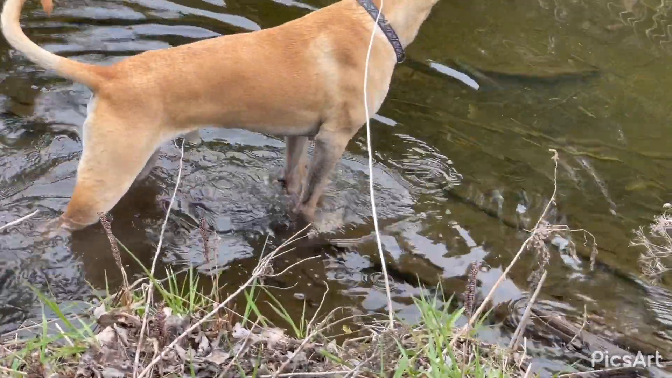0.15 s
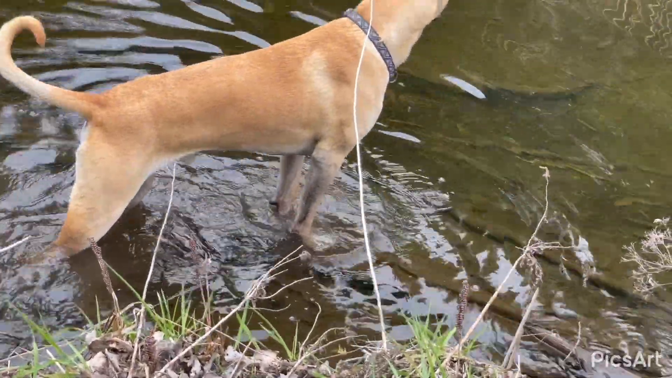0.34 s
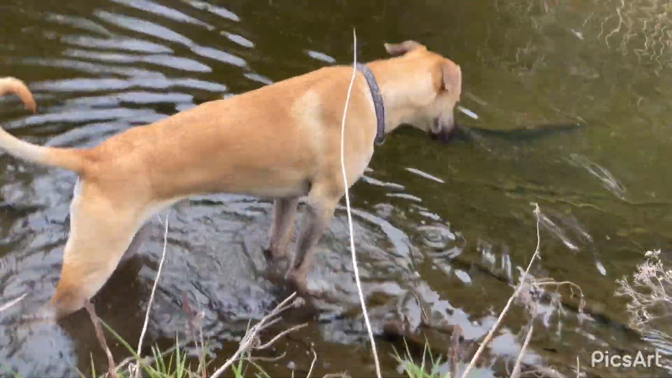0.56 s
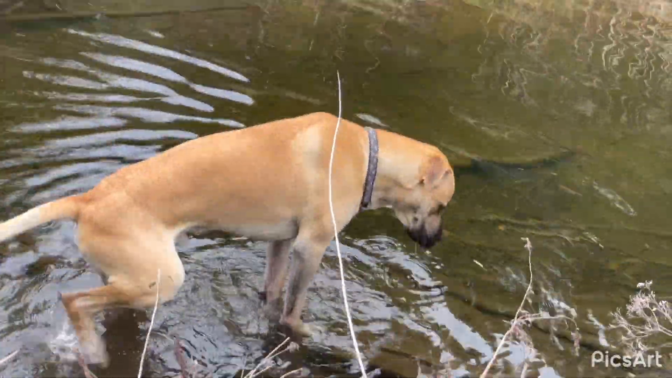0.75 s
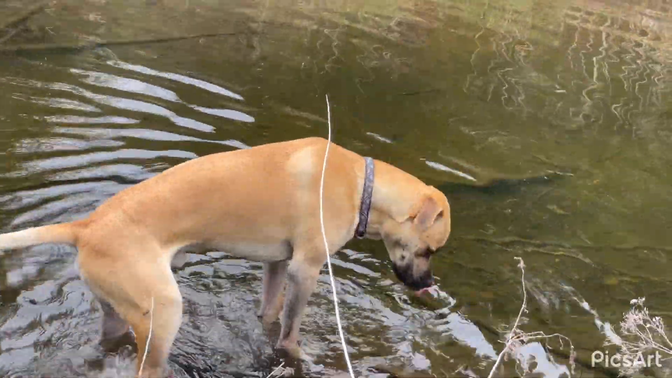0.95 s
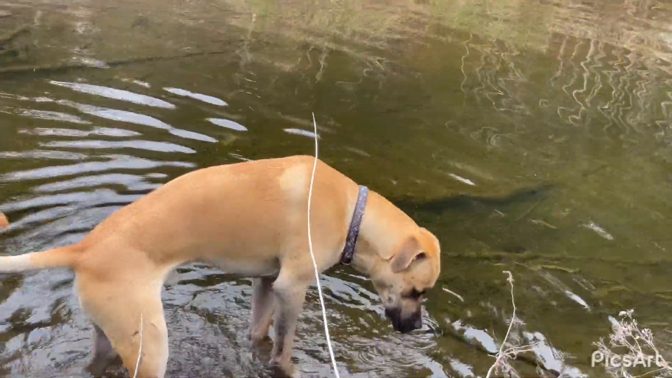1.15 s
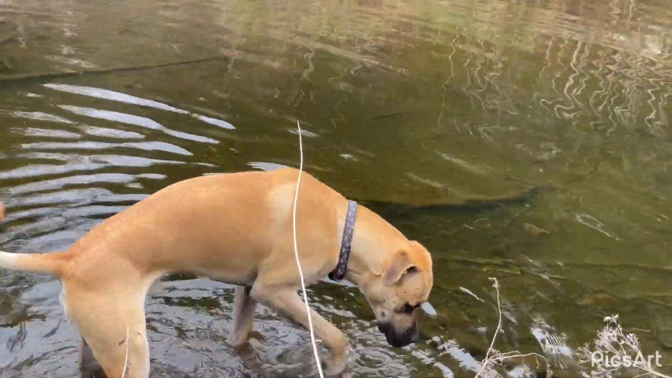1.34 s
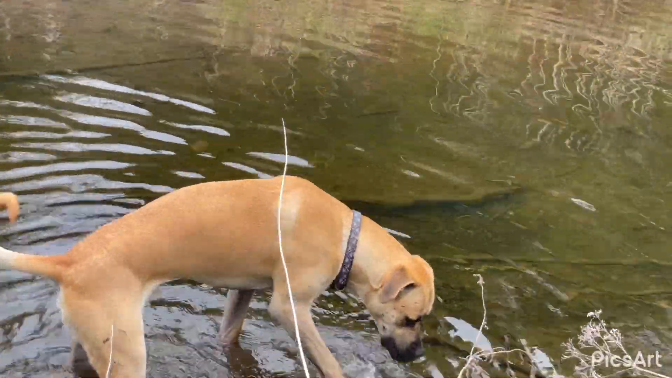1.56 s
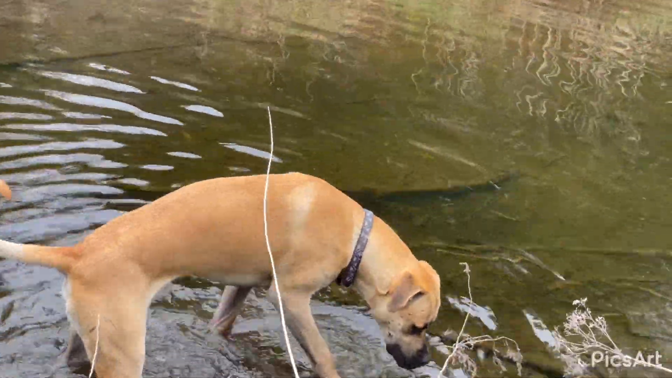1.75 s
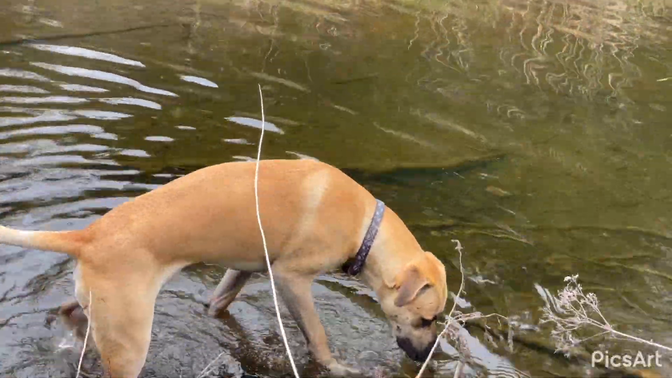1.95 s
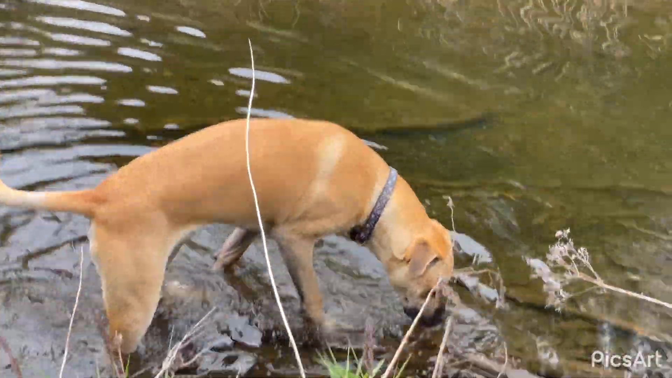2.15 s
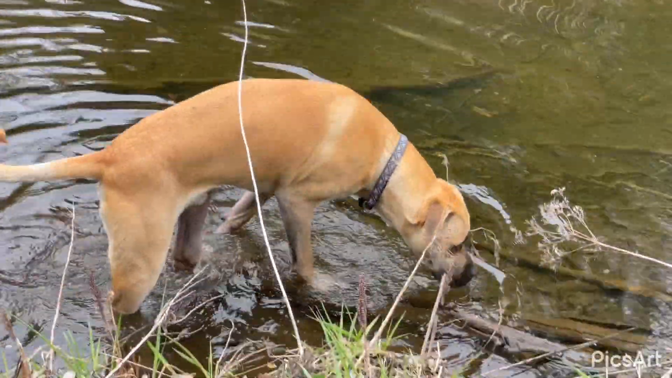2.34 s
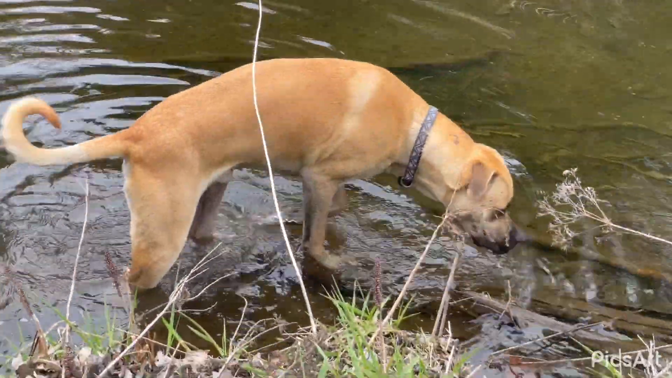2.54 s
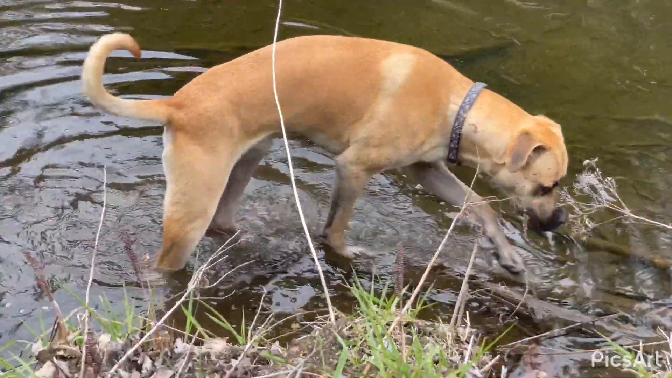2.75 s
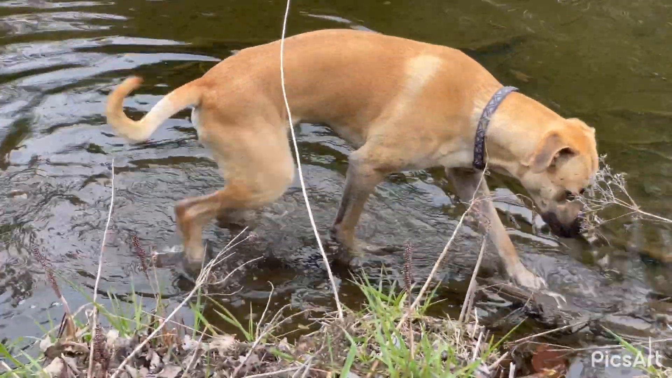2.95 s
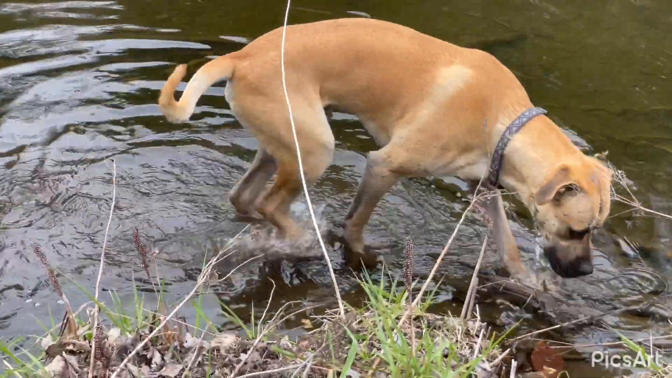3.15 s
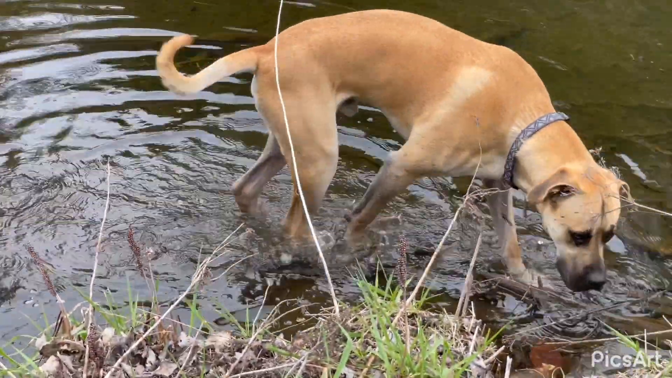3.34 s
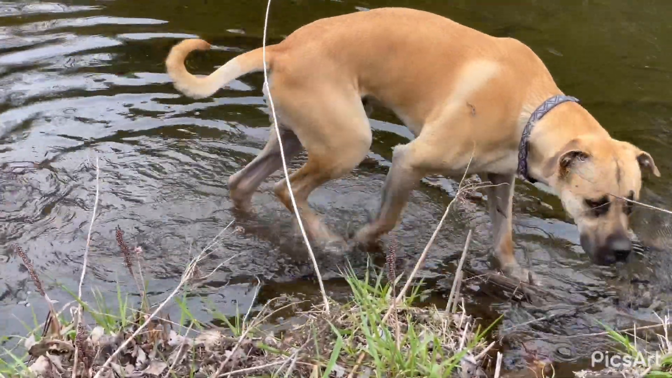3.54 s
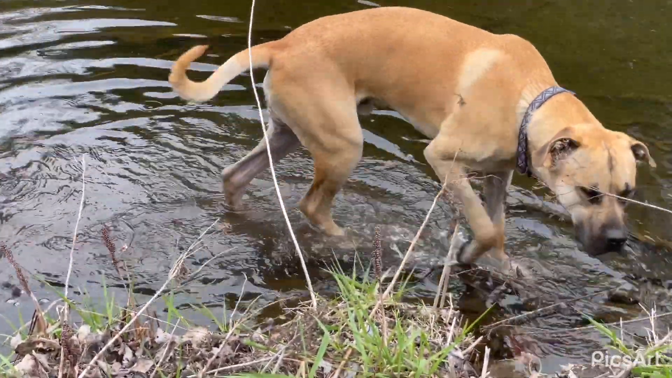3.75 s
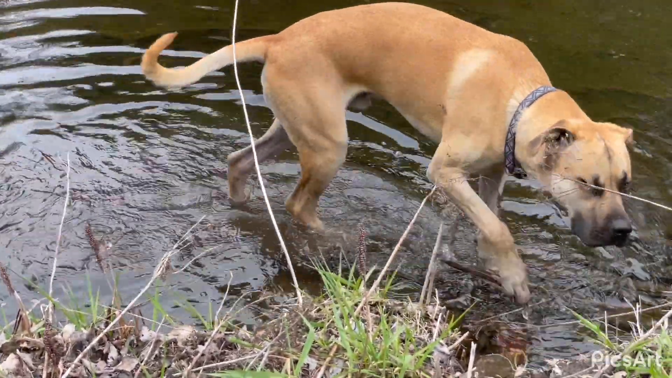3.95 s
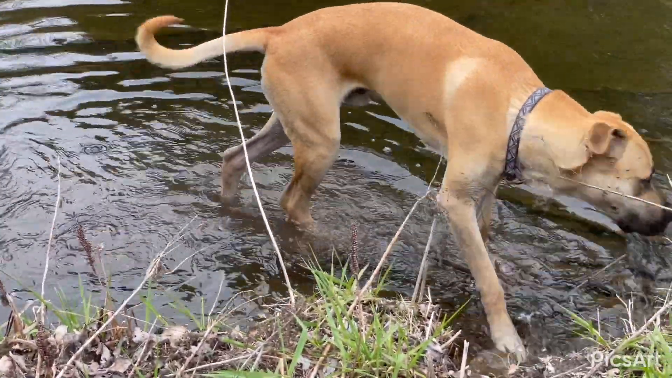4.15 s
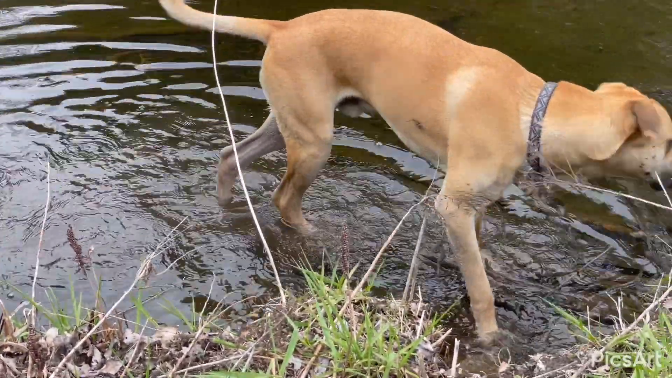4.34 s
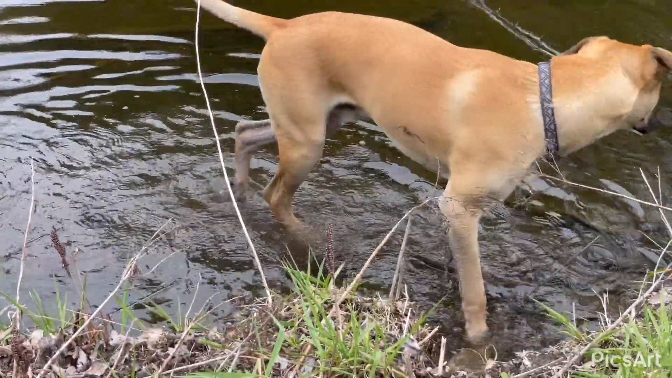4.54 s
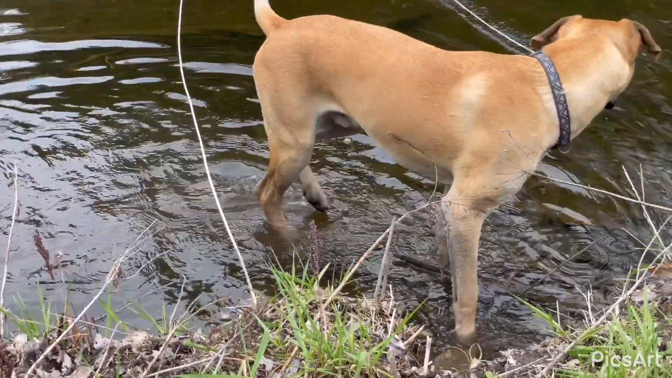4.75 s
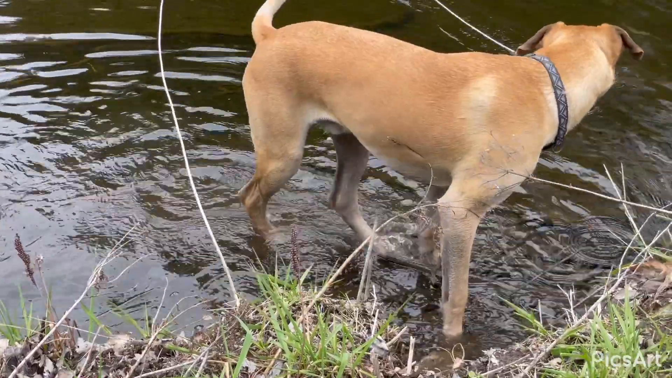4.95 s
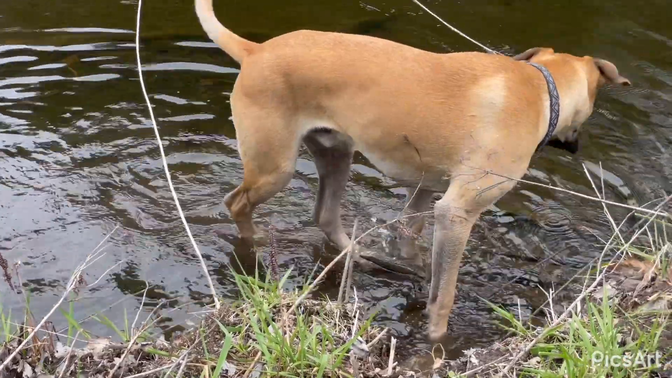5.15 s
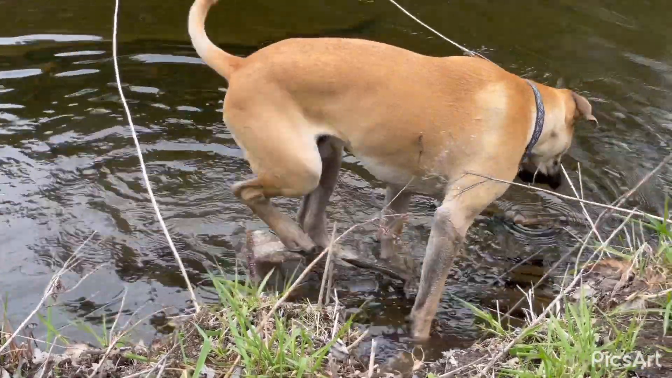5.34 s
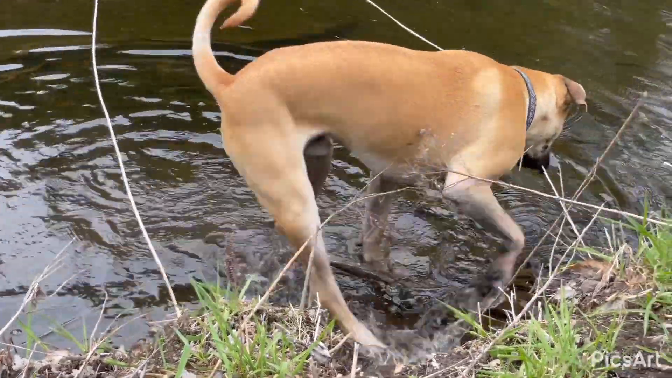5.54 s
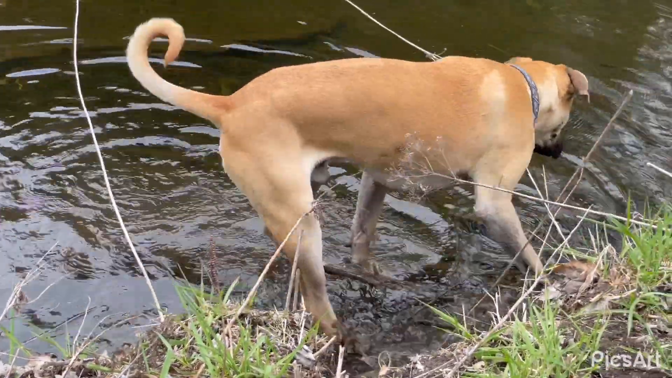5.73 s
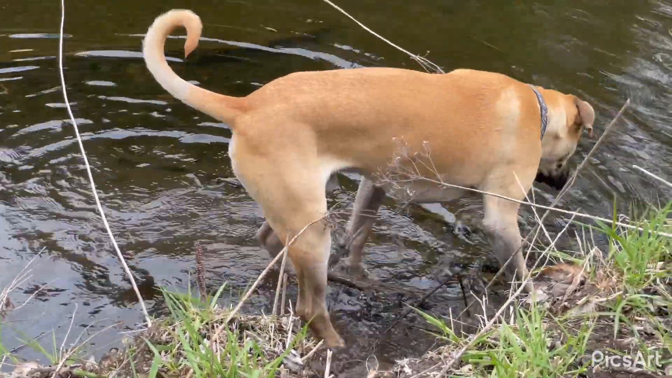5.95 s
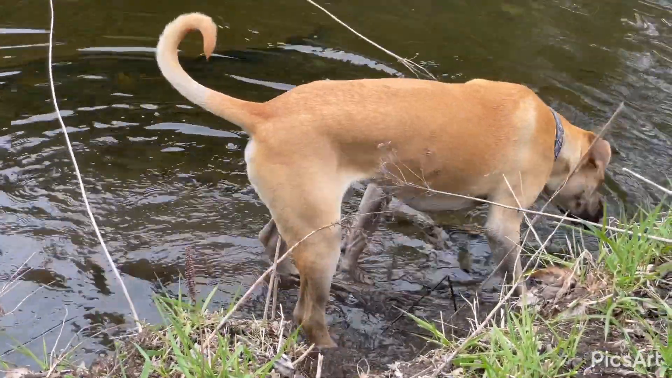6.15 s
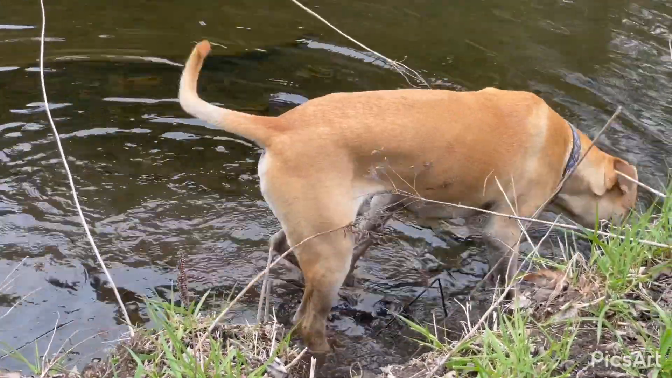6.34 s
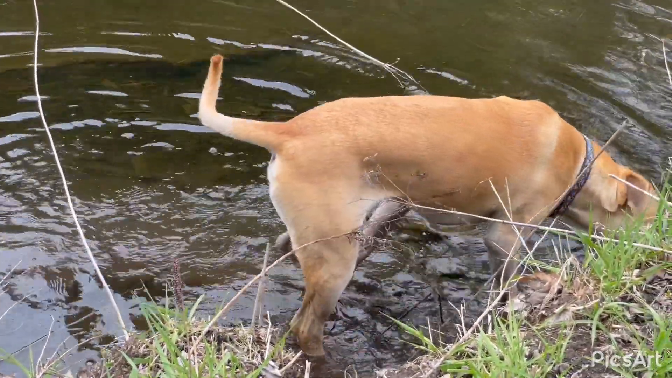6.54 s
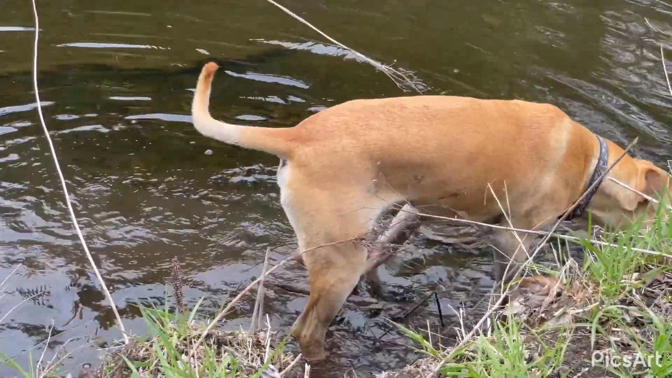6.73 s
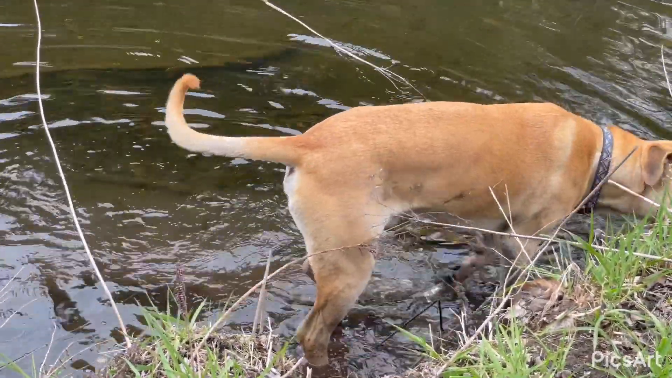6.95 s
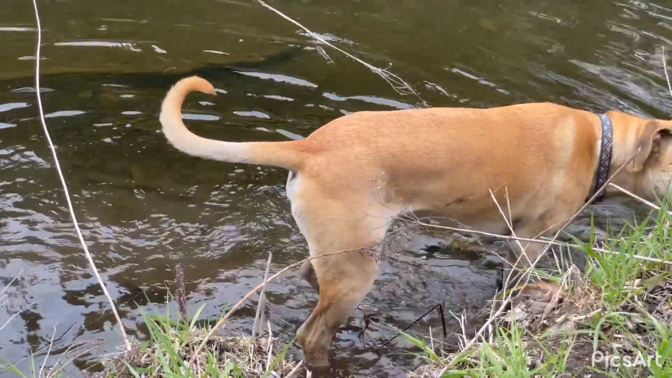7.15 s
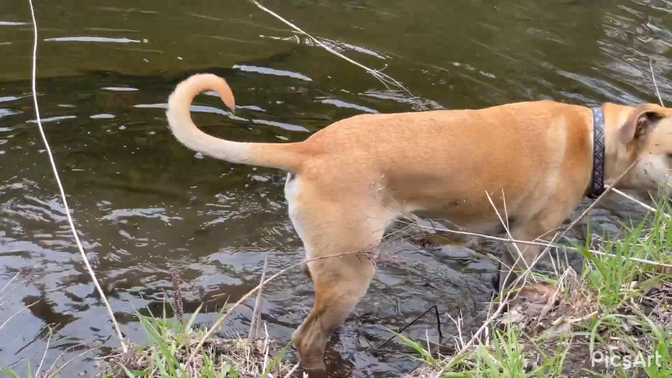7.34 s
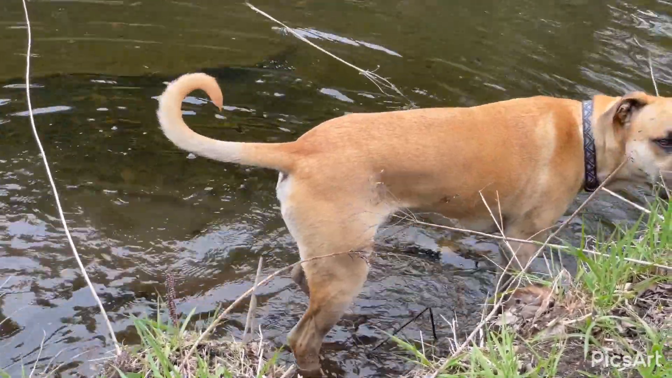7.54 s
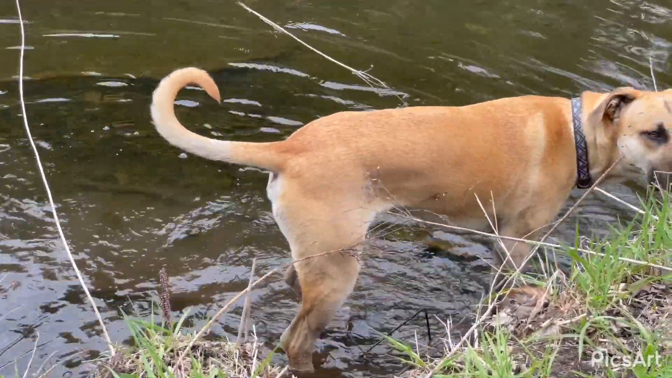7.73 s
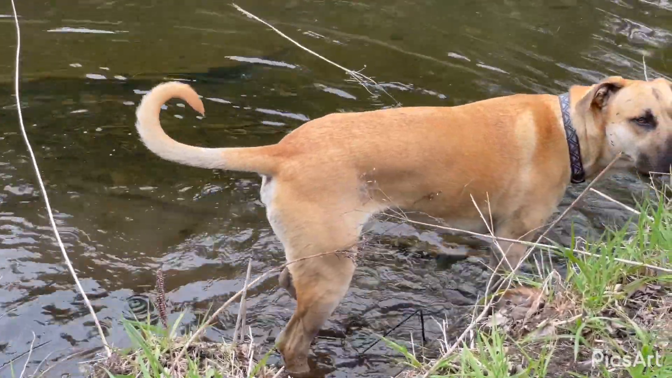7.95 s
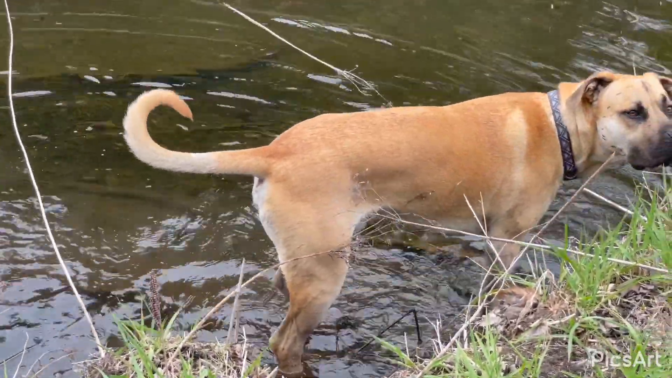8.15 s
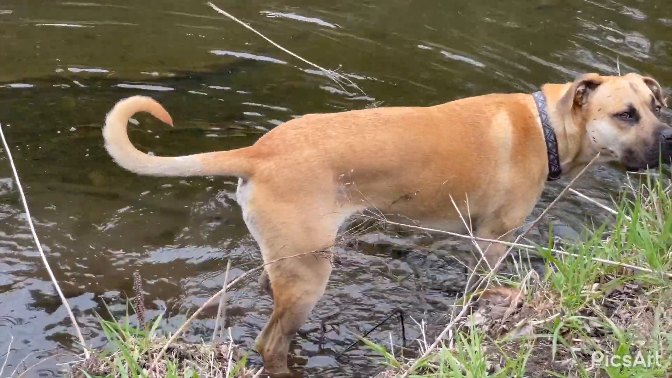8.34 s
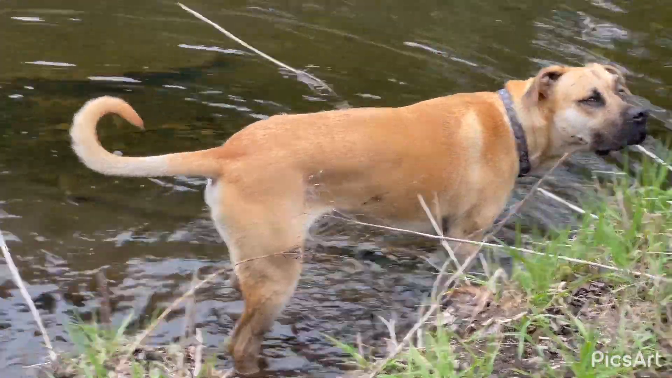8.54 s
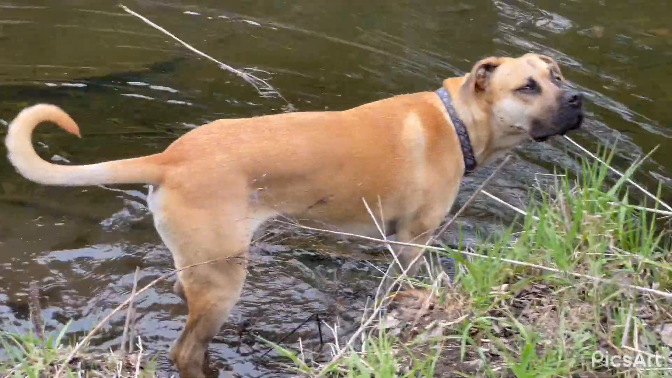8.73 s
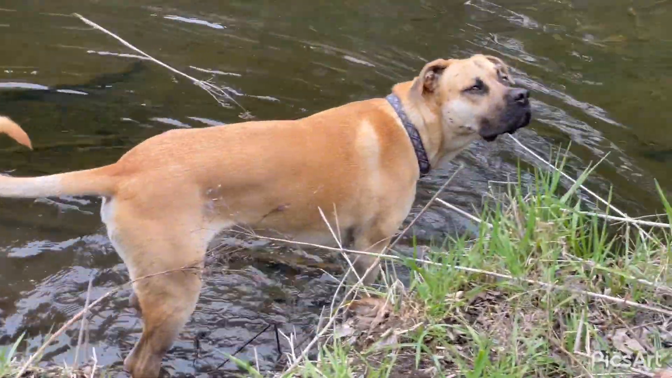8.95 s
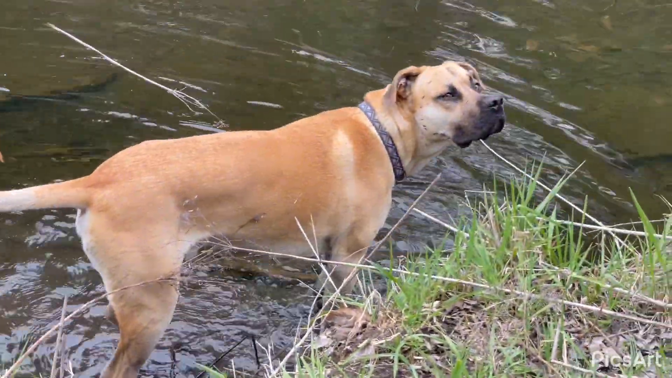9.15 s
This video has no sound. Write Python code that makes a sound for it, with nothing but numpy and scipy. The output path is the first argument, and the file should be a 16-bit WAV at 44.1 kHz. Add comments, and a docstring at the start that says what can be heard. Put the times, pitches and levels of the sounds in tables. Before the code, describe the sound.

Outdoors at a wooded creek, a handheld stereo microphone picks up dry skin-on-plastic rubbing first, then the gurgling churn of a dog's legs pushing through shallow water. Rounded plops, ringing bubbles and fine droplets follow each step, with quieter gaps. The water calms in the last third, leaving soft handling scuffs, a hard crack and thump on the case, a few ticks and a low distant rumble.

```python
"""Dog wading in a creek, hand on the camera

A dog wades in a shallow creek a few metres away: swarms of ringing bubbles churn with each stride, crackling
spray swells together with it, with single plops and gliding gulps; the banks return a dull scatter.
A hand rubs on the camera's case (coloured noise and slips), ticks against it and once bumps it sharply,
ringing its body. A far rumble and the hush of the woods lie underneath, at two closely spaced microphone ports."""
import sys
import numpy as np
from scipy import signal
from scipy.fft import rfft, irfft, next_fast_len
from scipy.io import wavfile
from scipy.ndimage import uniform_filter1d, map_coordinates

SR = 44100
rng = np.random.default_rng(int(sys.argv[2]) if len(sys.argv) > 2 else 0)


def transcribe(signal):
    """Save signal, clipped to [-1, 1], as a 16-bit WAV file at the path in sys.argv[1]."""
    frames = np.atleast_2d(signal).T
    limited = np.clip(frames, -1, 1)
    pcm = np.round(limited * 32767).astype(np.int16)
    wavfile.write(sys.argv[1], SR, pcm)


N = 405279
TOP_HZ = 15950  # band limit

# Spectrum of skin on the case. Each row: frequency in Hz, relative density in dB per Hz.
SKIN_SPECTRUM = [(60, 2), (200, 0.5), (330, -1), (550, -2.5), (1200, -0.5), (2000, -1.5), (3000, 1.5),
                 (5000, -0.5), (7000, 2), (9000, 2), (11500, -0.5), (13000, -1.5), (14500, 3),
                 (16000, -4.5)]


def amp(db):
    """Decibels to gain."""
    return 10 ** (np.asarray(db) / 20)


def unit(x):
    """Scale to rms 1."""
    return x / np.sqrt(np.mean(x ** 2) + 1e-20)


def along(points, hz):
    """Read (Hz, value) points on a log-frequency axis."""
    f, v = np.transpose(points)
    return np.interp(np.log(hz + 1), np.log(f + 1), v)


def curves(rows):
    """One value per sample for each column after the time in seconds."""
    s, *cols = np.transpose(rows)
    sample_s = np.arange(N) / SR
    return [np.interp(sample_s, s, c) for c in cols]


def wobble(rate):
    """A smooth random curve, rate knots a second."""
    knots = rng.standard_normal(int(N * rate / SR) + 4)
    return map_coordinates(knots, [np.arange(N) * rate / SR])


def filtered(x, response):
    """Apply a response of frequency, padded by half a second."""
    m = next_fast_len(N + SR // 2)
    hz = np.fft.rfftfreq(m, 1 / SR)
    return irfft(rfft(x, m) * response(hz), m)[..., :N]


def coloured(x, spectrum):
    """Colour x up to the band limit; a white input keeps its power."""
    return filtered(x, lambda hz: unit(amp(along(spectrum, hz)) * (hz < TOP_HZ)))


def steadied(x, seconds):
    """Hold a grain stream near rms 1 over the given time, leaving its fast flicker."""
    size = max(int(seconds * SR), 8)
    power = np.abs(uniform_filter1d(uniform_filter1d(x ** 2, size), size))
    return x / np.sqrt(power + 0.023 * power.mean())


def add(track, s, sound):
    """Mix a sound into a track at s seconds."""
    part = track[max(round(s * SR), 0):][:len(sound)]
    part += sound[:len(part)]


def crackle(rate, t60):
    """Random tiny noise bursts, rate a second, of overall rms 1: each starts at once and dies within milliseconds."""
    bursts = (rng.random(N) < rate / SR) * amp(-14 * rng.random(N))
    fade = amp(-60 * np.arange(SR // 50) / SR / t60)
    return unit(np.convolve(bursts, fade)[:N] * rng.choice([-1, 1], N))


def background(rumble_db=-54.0, air_db=-69.5):
    """A far rumble, barely wavering, and the faint hush of the woods: two coloured noises."""
    # Each row: frequency in Hz, relative density in dB per Hz.
    rumble_spectrum = [(20, -37), (35, -8), (50, -6), (65, 3.5), (82, 1.5), (100, -2), (125, -9),
                       (160, -14.5), (250, -30.5), (400, -40), (1000, -41), (3000, -78)]
    air_spectrum = [(100, 14.5), (500, 2), (1500, -4), (5000, -5.5), (16000, -8)]
    rumble = coloured(rng.standard_normal(N), rumble_spectrum) * amp(rumble_db + 0.3 * wobble(2.78))
    return rumble + amp(air_db) * coloured(rng.standard_normal(N), air_spectrum)


def sliding():
    """Level dB and treble dB of the hand: each slide sets in, swells and dies away to the resting grip."""
    # Slides of the hand on the case. Each row: start in seconds, length in seconds, level in dB, extra treble in dB.
    slides = [(0, 0.11, -49, -0.5), (0.205, 0.084, -47, 0), (0.329, .09, -42.5, 0.5),
              (.46, 0.076, -44.5, 0.5), (0.595, 0.031, -37, -1), (0.679, .15, -44.5, 0.5),
              (0.873, 0.057, -41, 1), (1, 0.31, -47.5, -2), (1.482, 0.22, -51, -1), (1.78, 0.077, -61.5, 4),
              (2.138, 0.44, -49.5, -2), (2.533, .03, -50.5, 5), (2.617, .2, -44.5, 5),
              (2.958, 0.047, -51.5, 1), (3.21, 0.047, -48, -1.5), (3.393, 0.017, -53, -5),
              (3.624, 0.17, -55.5, -1.5), (4.03, 0.021, -46.5, -3), (4.52, 0.027, -56, 1.5),
              (4.76, 0.86, -57, -1.5), (5.48, 0.058, -50, 4), (5.666, 0.034, -47.5, -0.5),
              (5.75, 0.055, -51, -1), (6.051, 0.039, -52, 3), (6.368, 0.26, -55.5, -1.5),
              (6.917, 0.077, -56.5, -3.5), (7.122, 0.14, -58.5, 1), (7.4, 0.16, -56.5, 8.5),
              (7.593, 0.15, -48.5, 0.5), (7.826, 0.24, -50.5, -0.5), (8.107, 0.14, -60.5, 3.5),
              (8.33, 0.11, -51.5, 0.5), (8.565, 0.4, -51.5, -1.5), (9.064, .08, -51.5, -2)]
    attack_s, release_s, drop_db = 0.06, 0.07, 13  # falls by drop_db over these times outside the slide
    arch_db = 2  # slower and quieter at both ends of a slide
    grip_db, uneven_db, uneven_rate = -64.5, 1.36, 17  # resting grip; wavering pressure, knots a second
    t = np.arange(0, N / SR, .002)
    power, bite = np.full(len(t), amp(grip_db) ** 2), np.zeros(len(t))
    for s, length, db, treble_db in slides:
        outside = np.maximum((s - t) / attack_s, (t - s - length) / release_s).clip(0)
        off_centre = np.clip(2 * (t - s) / length - 1, -1, 1)
        slide = amp(db - arch_db * off_centre ** 2 - drop_db * outside) ** 2
        power = power + slide
        bite = bite + slide * treble_db
    level_db, bite_db = curves(np.column_stack([t, 10 * np.log10(power), bite / power]))
    return level_db + uneven_db * wobble(uneven_rate), bite_db


def rubbing(level_db, bite_db, grain_db=1.0, stutter_db=3.5, slip_db=-0.5):
    """Skin on plastic: a fine hiss when it slides fast, separate slips when it creeps."""
    creep = np.clip((-40.0 - level_db) / 12, .2, 1)
    flicker_db = grain_db * wobble(900) + stutter_db * wobble(110)
    hiss = rng.standard_normal(N) * amp(creep * flicker_db)
    slips = amp(slip_db) * creep * crackle(rate=85, t60=0.0066)
    friction = steadied(coloured(unit(hiss) + slips, SKIN_SPECTRUM), 0.072)
    treble = filtered(friction, lambda hz: 1 - 1 / (1 + (hz / 6500) ** 4))
    return amp(level_db) * (friction + (amp(bite_db) - 1) * treble)


def swell(since, rise, fall):
    """Power of one push of water: it builds to 1 and settles again."""
    drop_db, curve = 13, 1.32  # quieter by this at the ends of rise and fall; roundness
    away = np.maximum(-since / max(rise, .01), since / max(fall, .01))
    return amp(-drop_db * np.minimum(np.abs(away), 9) ** curve) ** 2


def wading():
    """Slosh dB, spray dB and bubble pitch: as a leg ploughs deeper, the water grows louder and lower."""
    # A leg pushes through the water. Each row: time at its deepest in seconds, relative slosh level in dB,
    # build-up in seconds, settling in seconds, lowest centre pitch of the bubbles in Hz, relative spray level in dB.
    strides = [(.28, -53.5, 0.071, 0.085, 600, -73), (.61, -48.5, 0.041, .06, 1570, -63),
               (.87, -45.5, 0.11, 0.11, 618, -58), (0.929, -46.5, 0.039, 0.056, 1330, -55),
               (1.019, -49, 0.074, 0.063, 1710, -52), (1.101, -54, 0.057, .08, 854, -77),
               (1.31, -49.5, 0.048, 0.11, 1550, -57.5), (1.5, -50.5, 0.12, 0.13, 846, -50.5),
               (1.62, -56.5, .06, .11, 1500, -54.5), (1.96, -56, .05, 0.044, 1780, -59.5),
               (2.07, -45.5, 0.11, .085, 648, -60.5), (2.19, -48.5, 0.045, .1, 775, -61),
               (2.58, -52.5, 0.054, 0.046, 1630, -60), (2.89, -56, .03, 0.072, 1130, -60),
               (3.08, -45, 0.1, .12, 877, -52.5), (3.18, -46.5, 0.038, 0.056, 1000, -57),
               (3.245, -49, 0.016, 0.061, 1190, -51), (3.699, -47, 0.109, .12, 1146, -58),
               (3.83, -61, .04, 0.16, 1210, -56.5), (4.1, -57.5, 0.087, 0.089, 1146, -74),
               (4.21, -60, 0.027, 0.058, 990, -62), (4.68, -57, 0.1, .06, 1090, -64),
               (4.82, -61, .04, 0.069, 1600, -60.5), (4.99, -63, 0.054, 0.097, 1020, -81),
               (5.33, -51, .035, 0.12, 1320, -56.5), (5.52, -47.5, 0.047, 0.063, 1480, -48.5),
               (5.63, -51, .07, .11, 950, -58), (5.74, -52.5, .06, 0.07, 1704, -49),
               (5.825, -49, 0.024, .03, 1790, -54.5), (5.98, -59, 0.095, 0.14, 1380, -59),
               (6.37, -62, .05, .11, 1415, -71), (6.89, -59.5, 0.027, 0.085, 1550, -64),
               (7.02, -58.5, 0.061, 0.094, 970, -64), (7.22, -67, .05, 0.069, 1900, -59.5),
               (8.78, -54.5, 0.028, 0.058, 1350, -62)]
    lap_db, lap_hz, drip_db = -80, 1350, -85  # ripples and drips between strides
    shallow_hz = 2072  # centre pitch as the leg enters and leaves
    # spray swells together with each push and mostly settles a little slower
    spray_lag_s, spray_rise_s, spray_fall_s = 0.005, 0.086, .11
    t = np.arange(0, N / SR, .002)
    churn, drops = np.full(len(t), amp(lap_db) ** 2), np.full(len(t), amp(drip_db) ** 2)
    octave = churn * np.log2(lap_hz)  # log pitch weighted by power
    for s, db, rise, fall, deep_hz, spray_db in strides:
        push = amp(db) ** 2 * swell(t - s, rise, fall)
        glide = np.interp(t - s, [-abs(rise), 0, abs(fall)], np.log2([shallow_hz, deep_hz, shallow_hz]))
        churn = churn + push
        octave = octave + push * glide
        drops = drops + amp(spray_db) ** 2 * swell(t - s - spray_lag_s, spray_rise_s, spray_fall_s)
    pitch_hz = 2 ** (octave / churn)
    return curves(np.column_stack([t, 10 * np.log10(churn), 10 * np.log10(drops), pitch_hz]))


def bubble(t, hz, t60, rise):
    """A trapped air pocket rings, its pitch rising as it nears the surface."""
    onset = 1 - np.exp(-t * hz * 0.74)
    return onset * amp(-60 * t / t60) * np.sin(2 * np.pi * hz * t * (1 + rise * np.minimum(t / t60, 1) / 2))


def slosh(level_db, pitch_hz, count=9000, spread=0.452, cycles=21, size_db=5.5, rise=0.3):
    """A swarm of bubbles of random loudness, scattered around the given centre pitch."""
    start = rng.integers(0, N, count)
    hz = np.clip(pitch_hz[start] * np.exp(spread * rng.standard_normal(count)), 380, 6000)[:, None]
    t60 = np.clip(cycles / hz * np.exp(0.24 * rng.standard_normal((count, 1))), .003, .06)
    loudness = amp(size_db * np.minimum(rng.exponential(size=(count, 1)), 3))
    k = np.arange(SR // 45)
    grains = loudness * bubble(k / SR, hz, t60, rise) * (1 - (k / len(k)) ** 2)
    swarm = np.bincount((start[:, None] + k).ravel(), grains.ravel(), N)[:N]
    return amp(level_db) * steadied(swarm, 0.05)


def spray(level_db, drop_hz=3000, drops_db=-0.5, patter_db=-1):
    """Tiny droplets patter on the surface, some trapping a pinging bubble."""
    # Each row: frequency in Hz, relative density in dB per Hz.
    spray_spectrum = [(300, -5.5), (1000, -12), (2500, -5), (4000, -0.5), (6000, -1), (9000, -4.5),
                      (16000, -7)]
    patter = crackle(rate=260, t60=.009) + .3 * rng.standard_normal(N)
    pings = slosh(level_db + drops_db, np.full(N, drop_hz), count=2000, spread=.3, cycles=38, size_db=6, rise=.12)
    return pings + amp(level_db + patter_db) * steadied(coloured(patter, spray_spectrum), 0.025)


def banks(x, t60=0.26, wet_db=-15):
    """The banks and trees return a thin, dull scatter, different at each port."""
    t = np.arange(SR // 2) / SR
    tail = rng.standard_normal((2, len(t))) * amp(-60 * t / t60) * (t > .006)
    echo = signal.fftconvolve(x[None], tail / np.linalg.norm(tail[0]), axes=1)[:, :N]
    return amp(wet_db) * filtered(echo, lambda hz: 1 / (1 + (hz / 3500) ** 2))


def ticks(snap_db=-4, scuff_db=-7):
    """Noise bursts on the case: the briefest are thin bright snaps, longer ones scuff like the rubbing."""
    # Bright snaps and scuffs on the case; the loudest, at 7.6425 s, opens the bump.
    # Each row: start in seconds, relative level in dB, t60 in seconds.
    contacts = [(.2805, -25, .0025), (.478, -24, 0.017), (1.005, -28, 0.0037), (2.3057, -18.5, .0031),
                (2.6884, -21, 0.0028), (2.816, -20.5, 0.024), (3.987, -29, 0.004), (4.345, -31, 0.0027),
                (6.309, -30.5, 0.0052), (6.451, -32, 0.0041), (6.569, -33.5, 0.014), (7.085, -36, 0.0051),
                (7.6425, -2, 0.0029), (7.7307, -30, 0.0098), (7.922, -28, 0.0049), (7.956, -31, .0037),
                (8.2953, -13.5, 0.0026), (8.547, -35.5, 0.013), (8.693, -31, .0098), (8.9103, -27, 0.0037),
                (9.1128, -28, 0.0042), (9.1386, -29.5, 0.0051)]
    # Each row: frequency in Hz, relative density in dB per Hz.
    snap_spectrum = [(100, -6), (1500, -25.5), (5000, -22), (8000, 2), (11000, 6), (14000, 1), (16000, 8)]
    snaps, scuffs, t = np.zeros(N), np.zeros(N), np.arange(SR // 20) / SR
    for s, db, t60 in contacts:
        burst = amp(db - 60 * t / max(t60, .001)) * rng.choice([-1, 1], len(t))
        drag = np.clip((t60 - .002) / 0.013, 0, 1)
        add(snaps, s, np.sqrt(1 - drag) * burst)
        add(scuffs, s, np.sqrt(drag) * burst)
    return amp(snap_db) * coloured(snaps, snap_spectrum) + amp(scuff_db) * coloured(scuffs, SKIN_SPECTRUM)


def plops(count=6, rise=0.11, scatter=0.422, wake_db=-9):
    """Each plop is a slap, one main bubble and a few smaller ones in its wake."""
    # Paws going in and drops falling back. Each row: start in seconds, relative level in dB,
    # starting bubble pitch in Hz, relative slap level in dB on top of the bubble's.
    entries = [(.748, -28, 1146, -14), (.761, -32.5, 1560, -16), (.856, -31.5, 510, -14),
               (.878, -27, 572, -29), (1.027, -39.5, 1890, -5), (1.404, -29, 1100, -17.5),
               (1.492, -22, 563, -12.5), (1.602, -39, 1730, -22), (1.678, -40, 750, -18),
               (1.764, -47, 1570, -17), (1.969, -38, 1220, -28), (2.035, -34.5, 550, -25),
               (2.063, -27.5, 626, -38), (2.174, -29.5, 348, -21), (2.187, -32, 1030, -27),
               (2.646, -37, 1415, -19), (2.685, -39.5, 1860, -23), (2.785, -41, 1020, -22),
               (2.877, -41.5, 636, -16), (2.895, -37, 1390, -22), (2.951, -36.5, 653, -19),
               (3.023, -33, 1280, -23), (3.035, -33.5, 900, -16), (3.1, -33, 535, -26),
               (3.164, -30.5, 570, -24), (3.175, -34, 2000, -5), (3.232, -35, 1300, -2),
               (3.599, -42.5, 2250, -9.5), (3.78, -44.5, 567, -6), (3.858, -48, 1290, -2.5),
               (3.908, -40, 1216, -16), (4.203, -43.5, 760, -3), (4.25, -43.5, 1180, -12),
               (4.966, -33.5, 1007, -9), (5.028, -41, 427, -4.5), (5.224, -43, 1000, -19),
               (5.316, -36.5, 1350, -12), (5.385, -41, 2150, -12), (5.493, -37, 1370, -11),
               (5.549, -35, 1160, -14), (5.557, -33, 523, -5.5), (5.655, -36, 1060, -22),
               (5.707, -39.5, 2320, -6.5), (5.773, -38, 2060, -8), (5.819, -32.5, 2570, -5),
               (5.9, -40, 2340, -27), (6.012, -39, 1890, -10)]
    # Each row: frequency in Hz, relative density in dB per Hz.
    slap_spectrum = [(200, -8), (500, 1), (1200, 8), (2200, -3), (4000, -1), (7000, 0.5), (16000, -15)]
    ring_s, ring_slope = 0.034, 0.13  # t60 at 1 kHz; higher bubbles die sooner by this power of pitch
    rings, slaps, t = np.zeros(N), np.zeros(N), np.arange(SR // 8) / SR
    slap_fade = amp(-60 * t / .035)
    for s, db, hz, slap_db in entries:
        t60 = ring_s * (1000 / hz) ** ring_slope
        add(rings, s, amp(db) * bubble(t, hz, t60, rise))
        for late, detune in zip(rng.random(count), rng.standard_normal(count)):
            small_hz = np.clip(np.sqrt(hz * 1900) * np.exp(scatter * detune), 300, 6000)
            add(rings, s + .011 * late ** 2, amp(db + wake_db) * bubble(t, small_hz, 20 / small_hz, rise))
        add(slaps, s + 0.001008, amp(db + slap_db + 1.5) * slap_fade * rng.standard_normal(len(t)))
    return rings + coloured(slaps, slap_spectrum)


def gulps(flutter=0.47, gulp_db=-2):
    """A hollow in the water swells up, glides in pitch as it changes shape, and closes."""
    # Hollows closing behind a leg. Each row: start in seconds, relative level in dB, start pitch in Hz,
    # end pitch in Hz, length in seconds.
    hollows = [(3.231, -42, 250, 223, 0.045), (3.779, -43, 518, 670, 0.064), (3.982, -50, 235, 270, 0.033),
               (4.048, -56, 250, 330, 0.031), (4.133, -43, 675, 555, 0.021), (4.623, -52, 635, 1450, 0.031),
               (4.68, -43, 863, 1456, 0.022), (6.856, -52, 673, 630, 0.026), (6.88, -50, 1530, 1650, 0.039),
               (6.993, -47.5, 760, 1180, 0.065), (8.224, -57, 660, 655, 0.017)]
    track = np.zeros(N)
    for s, db, start_hz, end_hz, length in hollows:
        u = np.linspace(0, 1, max(int(length * SR), 64))
        phase = 2 * np.pi * np.cumsum(start_hz * (end_hz / start_hz) ** u ** 1.4) / SR
        envelope = (1 - np.exp(-u / 0.037)) * (1 - u)
        add(track, s, amp(db + gulp_db) * envelope * np.sin(phase))
    return track * (1 + flutter * wobble(130))


def knocks():
    """The bump cracks against the case (noise) and thumps the camera body (decaying modes)."""
    # The crack and thump of the bump, just after its opening snap. Each row: start in seconds,
    # relative crack level in dB, crack t60 in seconds, relative thump level in dB.
    bump = [(7.644, -18, 0.017, -12.5), (7.6458, -8.5, .014, -25.5)]
    # Modes of the camera body. Each row: frequency in Hz, relative level in dB, t60 in seconds.
    body_modes = [(86, -19.5, 0.1), (255, -11, 0.016), (357, 0, 0.014), (634, -18, 0.019)]
    # Each row: frequency in Hz, relative density in dB per Hz.
    crack_spectrum = [(100, -34), (1100, -24), (1900, -8), (2700, -1), (4000, -0.5), (5500, 0), (8000, 3),
                      (11500, -0.5), (13200, -5), (14600, 14), (16000, -15)]
    cracks, thumps, t = np.zeros(N), np.zeros(N), np.arange(SR // 8) / SR
    ring = sum(amp(db - 60 * t / t60) * np.sin(2 * np.pi * hz * t) for hz, db, t60 in body_modes)
    for s, crack_db, t60, thump_db in bump:
        add(cracks, s, amp(crack_db - 60 * t / t60) * rng.choice([-1, 1], len(t)))
        add(thumps, s, amp(thump_db) * ring)
    # the microphone does not follow the body's slowest motion
    highpass = signal.butter(2, 65, "highpass", fs=SR, output="sos")
    return coloured(cracks, crack_spectrum) + signal.sosfilt(highpass, thumps)


def ports(shared, stray):
    """Both ports get the shared sound, with a phase shift across the case; stray noise differs between them."""
    # Each row: frequency in Hz, phase lead of the left in radians.
    port_phase = [(20, 0), (2300, 0), (3100, .52), (5250, .35), (5700, -1.6), (6800, -.75), (7600, -2.2),
                  (8050, -2.3), (8700, -3.14), (11000, -4.6), (13500, -6.2), (16000, -6.7)]
    # Each row: frequency in Hz, likeness of the ports 0-1 (for equally strong shared and stray sound).
    port_alike = [(100, 0.96), (300, 0.91), (750, 0.29), (1800, 1), (4000, 0.96), (5700, 0.86),
                  (7600, 0.83), (8700, 1), (11000, 0.59), (14000, 1)]
    # Each row: frequency in Hz, left minus right gain in dB.
    port_balance = [(100, .8), (330, 1.3), (560, 3), (900, 1.4), (1400, 0.5), (2400, -0.16)]
    sign = np.array([[1], [-1]])

    def turn(hz):
        """Mixing angle in radians from the likeness."""
        return np.arccos(np.clip(along(port_alike, hz), 0, 1)) / 2

    def across(hz):
        """Half the phase and level difference to each port, with opposite signs."""
        return np.exp(.5j * sign * along(port_phase, hz)) * amp(sign * along(port_balance, hz) / 2)

    common = filtered(shared, lambda hz: np.cos(turn(hz)))
    differing = filtered(stray, lambda hz: np.sin(turn(hz)))
    return filtered(common + sign * differing, across)


def scene(churn_db=-1.5, gurgle_db=-5, plop_db=1):
    """The creek, the hand on the camera and the woods."""
    slosh_db, spray_db, pitch_hz = wading()
    hand_db, bite_db = sliding()
    churn = slosh(slosh_db + churn_db, pitch_hz)
    # fewer bubbles that ring on longer than the churn around them
    gurgle = slosh(slosh_db + gurgle_db, pitch_hz, count=1100, spread=0.344, cycles=53, size_db=5.5, rise=0.35)
    water = churn + gurgle + spray(spray_db) + amp(plop_db) * plops() + gulps()
    shared = water + rubbing(hand_db, bite_db) + ticks() + knocks() + background()
    stray = rubbing(hand_db, bite_db) + background() + spray(spray_db)
    return ports(shared, stray) + banks(water)


def record(dry):
    """The camera keeps nothing above its band limit."""
    return filtered(dry, lambda hz: hz < TOP_HZ)


dry = scene()
out = record(dry)
transcribe(out)
```